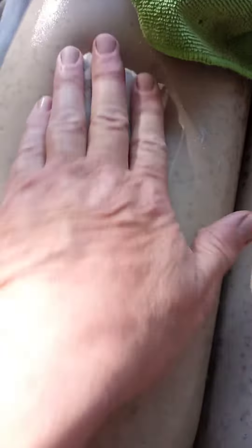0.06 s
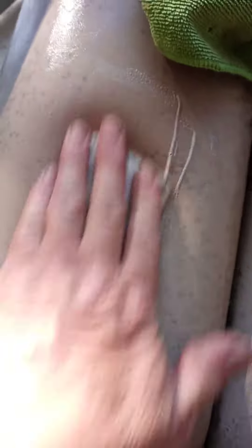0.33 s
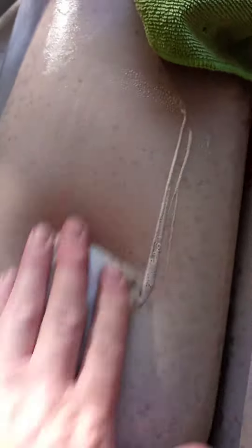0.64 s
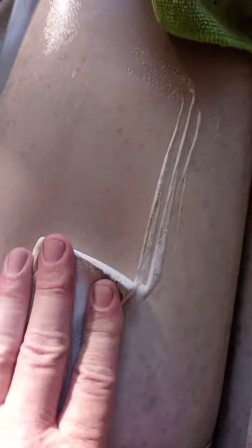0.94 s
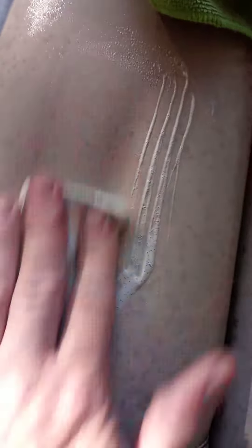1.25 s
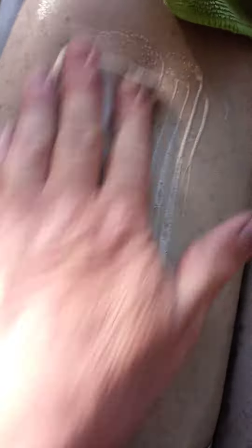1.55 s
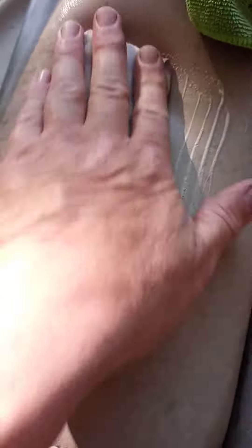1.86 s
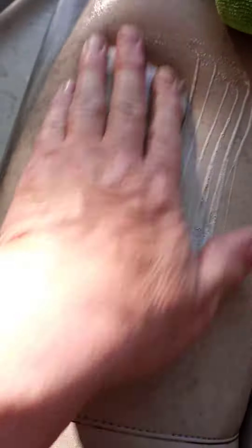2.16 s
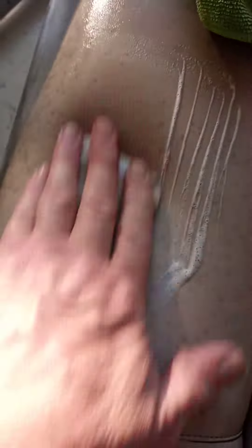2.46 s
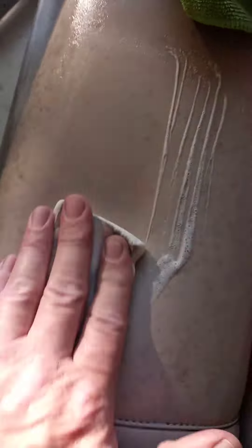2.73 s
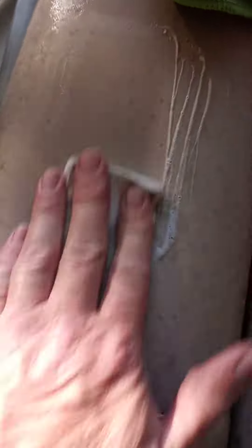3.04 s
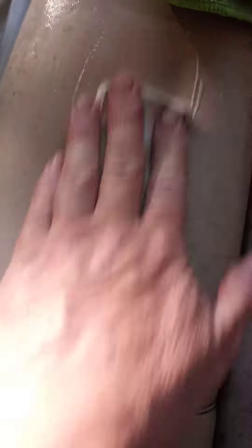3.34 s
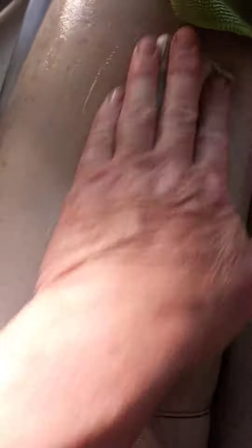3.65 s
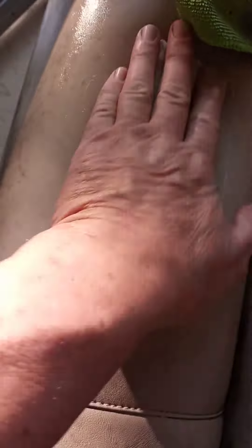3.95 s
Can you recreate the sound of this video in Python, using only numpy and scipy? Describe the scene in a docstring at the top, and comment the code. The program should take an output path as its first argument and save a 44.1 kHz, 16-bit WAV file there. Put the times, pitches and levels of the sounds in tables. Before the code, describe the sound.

A wet pad scrubs a vinyl seat close up from start to end, about 4 seconds, going back and forth almost three times a second. Each push is a dull rasp, each pull a brighter, slightly louder hiss. Small crunchy thuds mark the turns, strongest near 2.9 and 3.9 seconds, with soft foam fizz between. Behind, a quieter motor drones over a low outdoor rumble, slowly rising in pitch.

```python
"""Close, rhythmic scrubbing: a wet pad goes back and forth on a vinyl boat seat almost three times a second.
Friction excites the resonances of pad and seat, a dull rasp on the push and a brighter hiss on the pull;
the swish of the fibres rises and falls with the speed of the hand. At each turn the pad sticks with a
small thud, and foam fizzes in between. Behind it a motor drones over a low rumble, slowly gaining speed."""
import sys
import numpy as np
from scipy import signal
from scipy.fft import rfft, irfft
from scipy.io import wavfile

SR = 44100
rng = np.random.default_rng(int(sys.argv[2]) if len(sys.argv) > 2 else 0)


def waveform_to_disk(signal):
    """Save audio, clipped to [-1, 1], as 16-bit WAV at the path in sys.argv[1]."""
    frames = np.transpose(np.atleast_2d(signal))
    scaled = np.clip(frames, -1, 1) * 32767
    samples = np.round(scaled).astype(np.int16)
    wavfile.write(sys.argv[1], SR, samples)


N = 176400
t, freqs = np.arange(N) / SR, np.fft.rfftfreq(N, 1 / SR)


def amp(db):
    """Amplitude ratio of a level in decibels."""
    return 10 ** (np.asarray(db) / 20)


def unit(x):
    """Normalisation to rms 1."""
    return x / np.sqrt(np.mean(x ** 2) + 1e-20)


def coloured(x, points):
    """Spectral shaping by (f/Hz, gain/dB) points, interpolated in log frequency."""
    hz, db = np.transpose(points)
    return irfft(rfft(x) * amp(np.interp(np.log(freqs + 1), np.log(hz + 1), db)), N)


def wander(hz):
    """Band-limited random modulation up to the given frequency, rms 1."""
    return unit(irfft(rfft(rng.standard_normal(N))[:int(hz * N / SR) + 2], N))


def ringing(hz, width_hz):
    """A resonance driven by noise, rms 1."""
    detuning = (freqs - hz) / width_hz
    return unit(irfft(rfft(rng.standard_normal(N)) / (1 + 2 * detuning ** 2) ** 2, N))


def ramp(u):
    """A logistic step from 0 to 1."""
    return .5 + .5 * np.tanh(u / 2)


def swell(age, peak_s):
    """A gamma envelope: growth from 0 to 1 at peak_s, then exponential decay."""
    u = age / peak_s
    return (u * np.exp(1 - u)) ** 1.96


# Spectrum of the outdoor rumble: f/Hz, relative level/dB
RUMBLE_SPECTRUM = [(20, -25), (48, -10), (62, 3.5), (120, 1.5), (170, -1.5), (240, -3), (330, -9.5),
                   (430, -12.5), (600, -10.5), (900, -14.5), (1400, -21.5), (3000, -41.5)]

def rumble():
    """Low-frequency ambient noise, one band of which swells once."""
    steady = amp(-39.5) * unit(coloured(rng.standard_normal(N), RUMBLE_SPECTRUM))
    surge = amp(-41) * np.exp(-.5 * ((t - 0.65) / 0.068) ** 2)
    return steady + surge * ringing(hz=122, width_hz=75)


# Course of the motor: t/s, fundamental f/Hz, level/dB of harmonics 1, 2 and 3
MOTOR_HARMONICS = [(0, 71.12, -38, -44, -47), (.65, 74.8, -41, -56.5, -66), (1.25, 77.03, -51, -65, -66),
                   (1.7, 81, -43, -50, -60), (2.6, 81.37, -43.5, -54.5, -48),
                   (3.099, 83.06, -43.5, -46, -56.5), (3.5, 86.07, -36.5, -43.5, -67),
                   (4, 88.5, -39.5, -41.5, -47)]

def motor():
    """Periodic motion gives a harmonic series, which rises with the motor's speed over a steady hum."""
    def wavering_phase(hz, rate_hz):
        return 2 * np.pi * np.cumsum(hz * (1 + 0.01535 * wander(rate_hz))) / SR

    times, *columns = np.transpose(MOTOR_HARMONICS)
    hz, *levels = [np.interp(t, times, column) for column in columns]
    phase = wavering_phase(hz, rate_hz=9.7)
    drone = sum(amp(db - 1.5 * wander(hz=5.7)) * np.sin(k * phase) for k, db in enumerate(levels, 1))
    hum = amp(-49) * np.sin(wavering_phase(hz=67.5, rate_hz=6.5))
    return np.sqrt(2) * (drone + hum)


# Frequency response of pad and seat: f/Hz, gain/dB
PAD_RESPONSE = [(410, -43), (700, -15.5), (1130, -11.5), (1360, -6.5), (1600, -6), (1850, -5), (2130, -2),
                (2500, -12), (3000, -10.5), (3500, -8), (4000, -10.5), (4900, -8.5), (5800, -2.5),
                (6700, 0.5), (7250, -2), (7950, -15.5), (8600, -16), (10400, -8), (11800, -16),
                (13500, -24), (14700, -11.5), (15800, -10)]

def grains(per_s=12000, spread_db=2, hiss_share=0.53):
    """Shot noise: countless tiny slips and bursting bubbles excite the resonances of pad and seat."""
    sizes = amp(spread_db * np.minimum(rng.exponential(1, N), 5)) * rng.choice([-1, 1], N)
    clicks = unit(sizes * (rng.random(N) < per_s / SR))
    return unit(coloured(clicks + hiss_share * rng.standard_normal(N), PAD_RESPONSE))


# Envelope of the continuous fizz: t/s, level/dB
FOAM_LEVELS = [(0, -41), (.2, -40.5), (.57, -42), (.93, -41.5), (1.65, -43), (2.35, -42.5), (2.7, -41.5),
               (3.06, -43), (3.4, -45.5), (3.75, -41.5)]
# Filter that colours the fizz: f/Hz, gain/dB
FOAM_TONE = [(500, 14), (1300, 0), (2100, 0.5), (3500, 1.5), (6500, -3), (10000, -6), (15500, -1.5)]

def foam(release_db=-50, fade_s=0.055):
    """Bursting bubbles: soapy water fizzes under the pad, most when a pull has squeezed it out."""
    steady = amp(np.interp(t, *np.transpose(FOAM_LEVELS)))
    release = sum((t > end) * np.exp(-abs(t - end) / fade_s) for _, end, *_ in PULLS)
    return (steady + amp(release_db) * release) * coloured(grains(), FOAM_TONE)


# The pad tears loose at the start of a stroke: t/s, level/dB
BREAKAWAYS = [(.046, -41), (.238, -31.5), (.769, -33), (.959, -36), (1.131, -46), (1.674, -38),
              (2.030, -38), (2.386, -37.5), (2.739, -44), (2.907, -37)]

def scrapes(half_width_s=0.0047):
    """Static friction gives way: the first slow slip of a stroke rings a low resonance of the pad."""
    envelope = sum(amp(db) / (1 + ((t - at) / half_width_s) ** 4) for at, db in BREAKAWAYS)
    return envelope * ringing(hz=2050, width_hz=1150)


# The pad grabs at the end of a stroke: t/s, thud level/dB, thud f/Hz, crunch level/dB
GRABS = [(.005, -34.5, 736, -33), (.184, -45, 530, -31), (.363, -35.5, 620, -29), (.547, -38.5, 690, -43),
         (.721, -34, 407, -31.5), (.903, -47, 613, -41), (1.083, -42, 605, -29), (1.260, -37, 750, -39),
         (1.437, -33.5, 560, -31), (1.618, -63, 800, -35), (1.791, -40, 544, -35), (1.974, -55, 760, -35),
         (2.147, -34.5, 358, -31), (2.330, -39.5, 770, -32.5), (2.506, -31.5, 500, -28.5),
         (2.681, -35.5, 650, -31), (2.857, -25, 530, -29), (3.033, -35, 750, -31.5),
         (3.203, -37.5, 469, -30), (3.380, -37.5, 1100, -31.5), (3.550, -33.5, 467.5, -26),
         (3.735, -38, 700, -33), (3.912, -27.5, 577, -36)]
# Spectrum of the wet crunch: f/Hz, relative level/dB
CRUNCH_SPECTRUM = [(400, -9), (900, -3.5), (1800, -1.5), (2500, -2), (3400, -3.5), (4500, -7), (6500, -3),
                   (8000, -17), (16000, -43)]

def grabs(rise_s=0.0022):
    """Transient vibration: the sticking pad shakes the vinyl for a few cycles, with a crunch on each."""
    thud, crunch = np.zeros(N), np.zeros(N)
    for (at, thud_db, hz, crunch_db), phase in zip(GRABS, rng.random(len(GRABS))):
        on = (t > at - 2 * rise_s) & (t < at + 10 * rise_s)
        age = t[on] - at
        envelope = np.exp(-(age / (2 * rise_s)) ** 2) * np.minimum(age / rise_s + 2, 1)
        cycle = np.sin(2 * np.pi * (hz * age + phase))
        thud[on] += amp(thud_db) * envelope * cycle * np.sqrt(2)
        crunch[on] += amp(crunch_db) * envelope * (1 + .5 * cycle)
    roughness = 1 + .55 * wander(hz=259)
    return thud * roughness + crunch * unit(coloured(rng.standard_normal(N), CRUNCH_SPECTRUM))


def squeals(strokes):
    """Stick-slip: at middling speed, early and late in a stroke, fibres slip together and the pad rings."""
    envelope = np.zeros(N)
    for start, end, _, _, opening_db, closing_db in strokes:
        on = (t > start) & (t < end)
        opening = amp(opening_db) * swell(t[on] - start, peak_s=0.026)
        closing = amp(closing_db) * swell(end - t[on], peak_s=0.015)
        envelope[on] = opening + closing
    return envelope * ringing(hz=6550, width_hz=1200)


def chirps(strokes):
    """Stick-slip rings a lower resonance as a stroke stops, 3 dB below its closing squeal."""
    envelope = np.zeros(N)
    for start, end, *_, closing_db in strokes:
        on = (t > start) & (t < end)
        envelope[on] = amp(closing_db - 3) * swell(end - t[on], peak_s=0.01)
    return envelope * ringing(hz=3360, width_hz=1000)


def hand_motion(strokes, grip_db, bite_db=3, press_s=0.0027):
    """Sliding speed and friction amplitude: the pad grips as it sets off and bites just before it stops."""
    speed, friction = np.zeros(N), np.zeros(N)
    for start, end, db, top_speed, *_ in strokes:
        on = (t > start - 10 * press_s) & (t < end)
        since, left = t[on] - start, end - t[on]
        cruise = top_speed * (1 - 0.24 * (since / (end - start)) ** 2)
        speeding_up = ramp((since - 0.021) / 0.011)
        slowing_down = 1 - np.exp(-left / 0.013)
        speed[on] = cruise * speeding_up * slowing_down
        contact = ramp((since - 0.00041) / press_s)
        grip = grip_db * swell(np.maximum(since, 0), peak_s=0.019)
        bite = bite_db * np.exp(-left / 0.012)
        friction[on] = amp(db + grip + bite) * contact
    return speed, friction


# Strokes away from the body (pushes) and towards it (pulls):
# start t/s, end t/s, level/dB, relative speed (0-1), opening squeal level/dB, closing squeal level/dB
PUSHES = [(0.039, 0.187, -30.5, 0.56, -43, -36), (0.403, 0.552, -31.5, 0.64, -45, -30),
          (0.762, 0.91, -31, 0.66, -36.5, -31), (1.12, 1.265, -31, 0.65, -38, -29.5),
          (1.479, 1.623, -30.5, 0.73, -39, -29), (1.83, 1.976, -30.5, 0.64, -37, -31),
          (2.184, 2.334, -30.5, 0.62, -44, -32.5), (2.539, 2.688, -31.5, 0.65, -42, -37),
          (2.891, 3.036, -30.5, 0.52, -46, -40), (3.233, 3.383, -32.5, 0.5, -61, -39),
          (3.582, 3.740, -33, 0.45, -44, -35), (3.952, 4.100, -31.5, .75, -53, -47)]
PULLS = [(-.130, 0.008, -31.5, 0.7, -40, -27.5), (0.224, 0.366, -28.5, 0.6, -31, -33.5),
         (0.587, 0.725, -28, .9, -33, -31.5), (0.949, 1.088, -28, 1.0, -29, -31.5),
         (1.301, 1.445, -28, 0.9, -36, -28), (1.661, 1.797, -28.5, 0.99, -32, -29),
         (2.015, 2.154, -29, 1.0, -34.5, -33.5), (2.375, 2.511, -29, 0.86, -31.5, -33.5),
         (2.727, 2.865, -29, 0.82, -32.5, -33), (3.076, 3.209, -28.5, 0.76, -48, -33.5),
         (3.420, 3.554, -29, 0.57, -50, -32), (3.772, 3.921, -30, 0.64, -37, -33.5)]
# Filters that colour the rubbing in each direction: f/Hz, gain/dB
PUSH_TONE = [(400, -58), (1000, -1.5), (1700, 1), (2500, 4.5), (3600, 0), (6500, -4), (10000, -1),
             (15500, 0.5)]
PULL_TONE = [(400, 2), (1000, -6.5), (1700, -3), (2500, -0.5), (3600, 2), (6500, -2), (10000, 0.5),
             (15500, 0.5)]

def scrub(strokes, tone, grip_db, full_speed_slip_hz=12740, swish_db=1.5, bands=30):
    """Sliding friction: fibres slip at a rate proportional to speed, and the noise rolls off above it."""
    speed, friction = hand_motion(strokes, grip_db)
    slip_hz = full_speed_slip_hz * speed + 1
    spectrum = rfft(coloured(grains(), tone))
    centres = np.geomspace(500, 16000, bands)
    rubbing = np.zeros(N)
    for hz, weights in zip(centres, np.eye(bands)):
        band = irfft(spectrum * np.interp(freqs, centres, weights), N)
        ratio = hz / slip_hz
        swish = np.exp(-.5 * (np.log2(ratio) / .35) ** 2)  # spectral peak at the slip rate
        flicker_db = 1.64 * wander(hz=43.8)
        roll_off = 1 / np.sqrt(1 + (ratio / 2) ** 1.98)  # about 6 dB per octave
        rubbing += band * amp(swish_db * swish + flicker_db) * roll_off
    judder = amp(-0.5 * wander(hz=141))
    return rubbing * friction * judder


def scene():
    """Superposition: all sources add at one point in the open air, the same in both channels."""
    rubbing = scrub(PUSHES, PUSH_TONE, grip_db=0.1) + scrub(PULLS, PULL_TONE, grip_db=2)
    pad = rubbing + scrapes() + squeals(PUSHES + PULLS) + chirps(PULLS) + grabs() + foam()
    mono = pad + motor() + rumble()
    return np.array([mono, mono])


def record(dry):
    """Band limiting: a linear-phase low-pass filter cuts off at 15.9 kHz."""
    taps = signal.firwin(511, 15900, window=("kaiser", 9), fs=SR)
    return signal.oaconvolve(dry, taps[None], "same")


dry = scene()
out = record(dry)
waveform_to_disk(out)
```